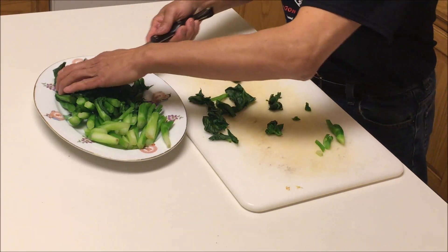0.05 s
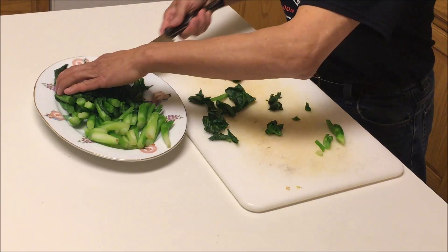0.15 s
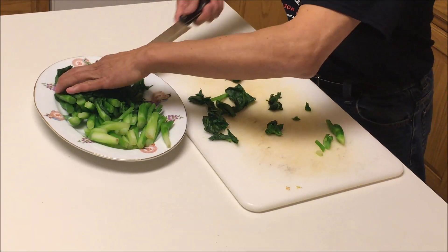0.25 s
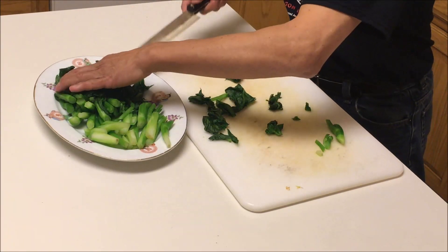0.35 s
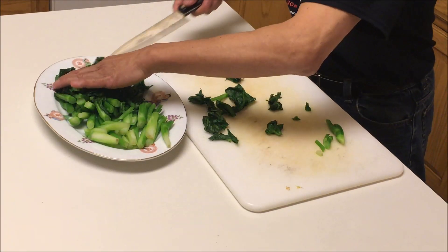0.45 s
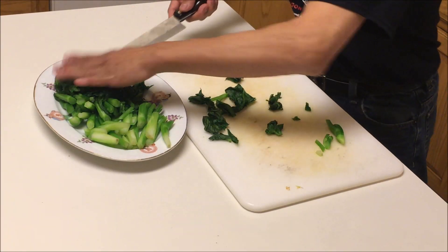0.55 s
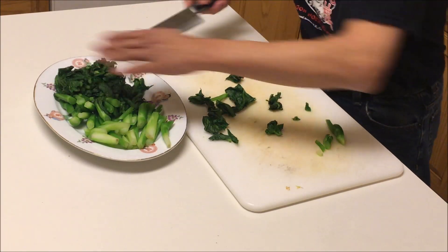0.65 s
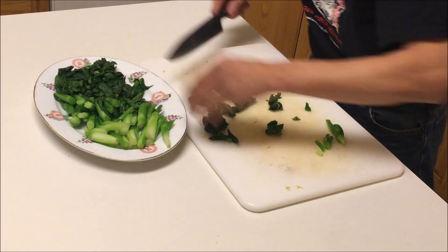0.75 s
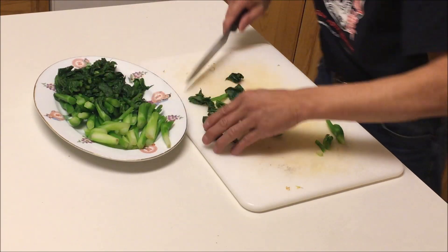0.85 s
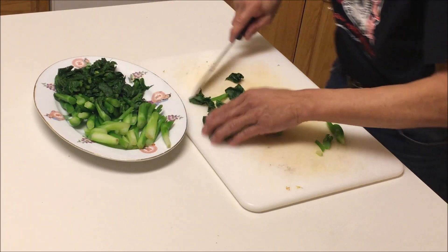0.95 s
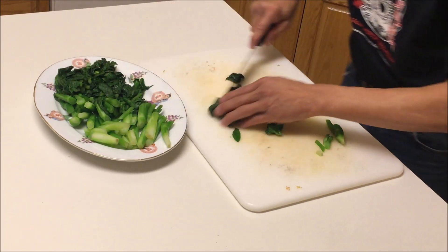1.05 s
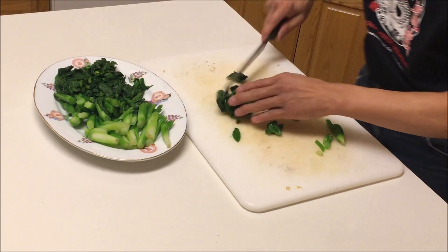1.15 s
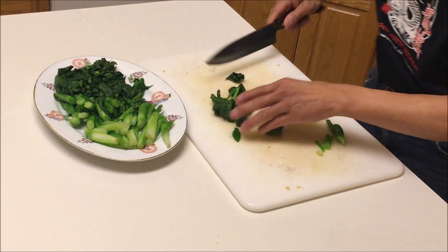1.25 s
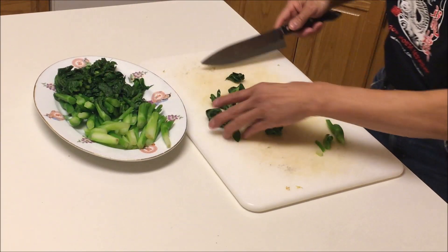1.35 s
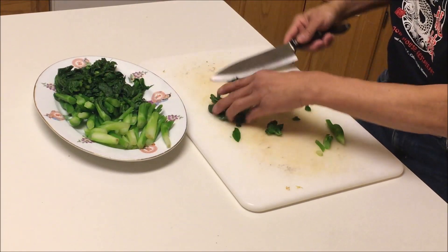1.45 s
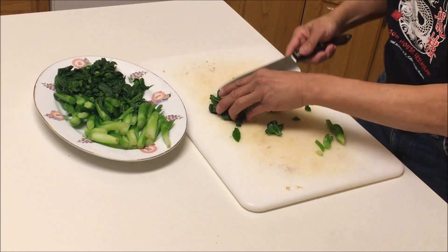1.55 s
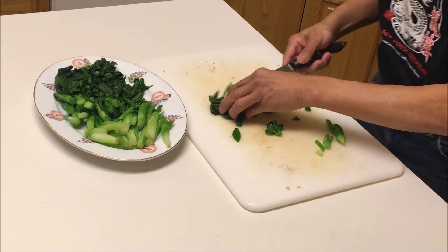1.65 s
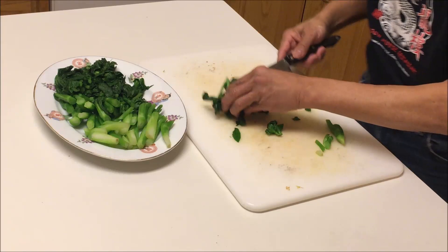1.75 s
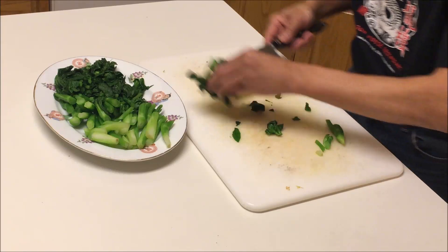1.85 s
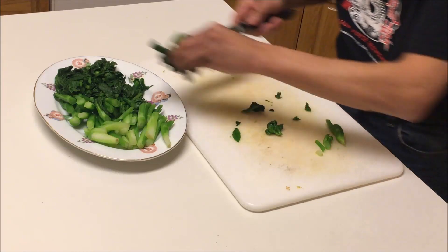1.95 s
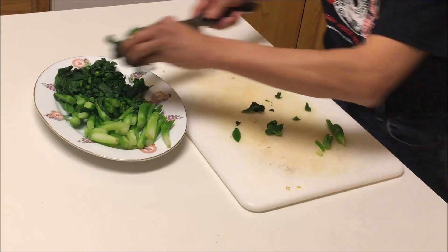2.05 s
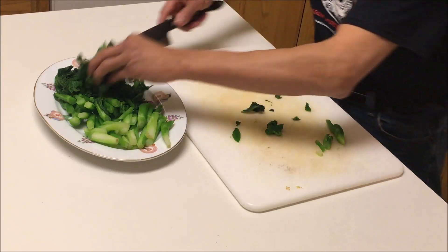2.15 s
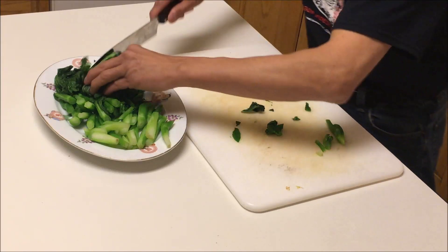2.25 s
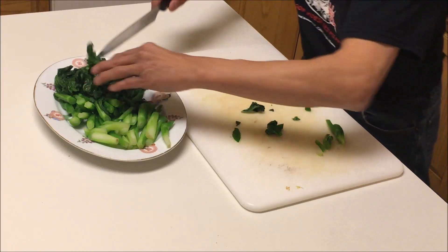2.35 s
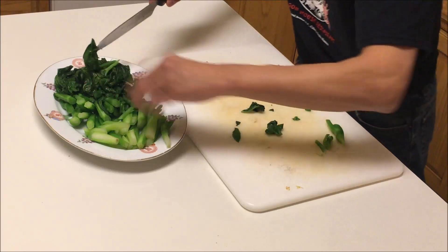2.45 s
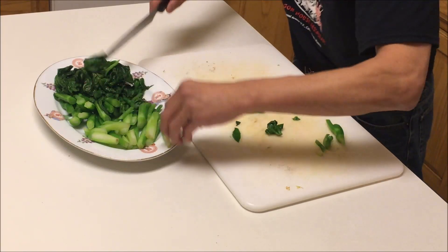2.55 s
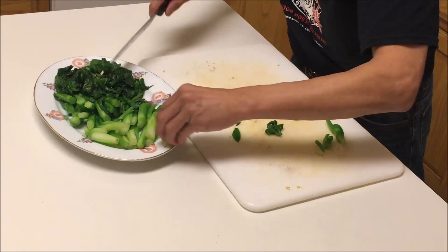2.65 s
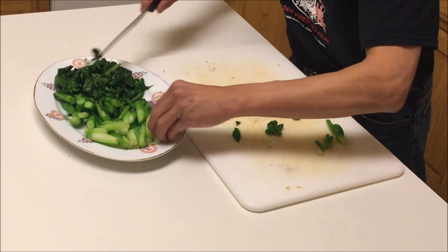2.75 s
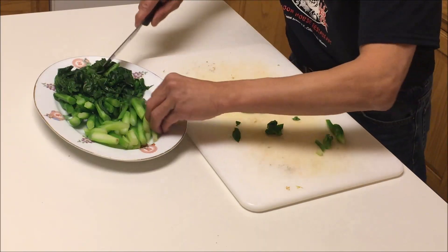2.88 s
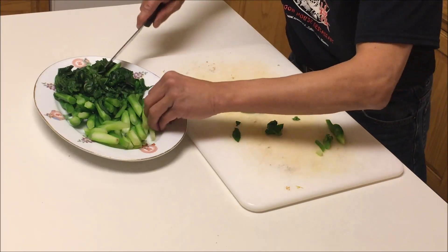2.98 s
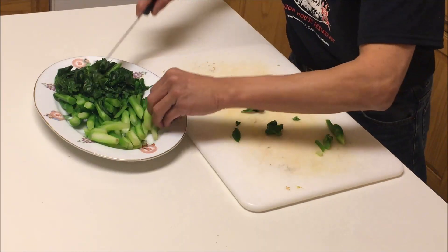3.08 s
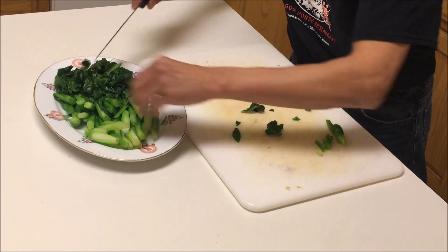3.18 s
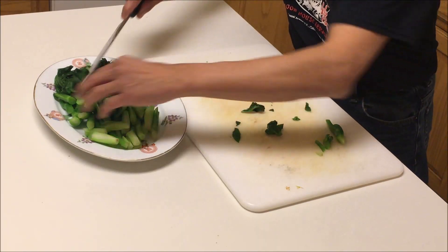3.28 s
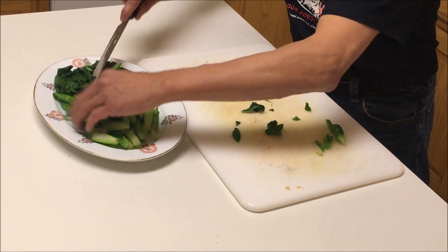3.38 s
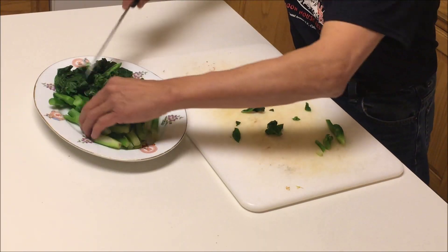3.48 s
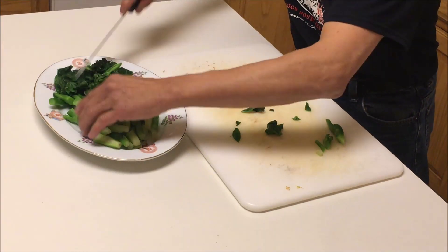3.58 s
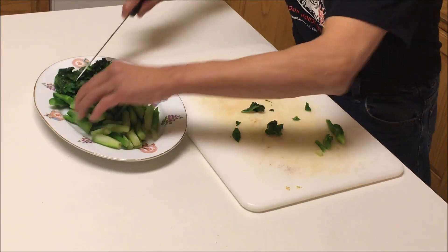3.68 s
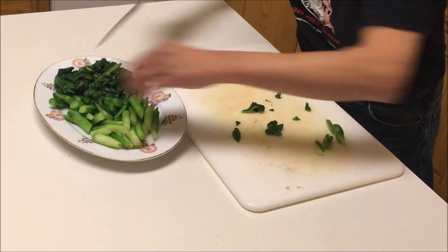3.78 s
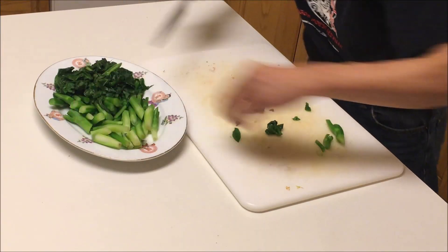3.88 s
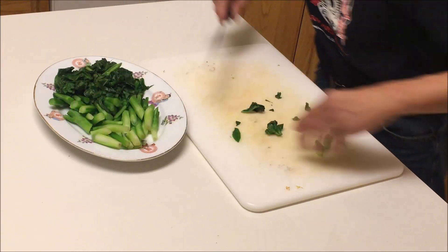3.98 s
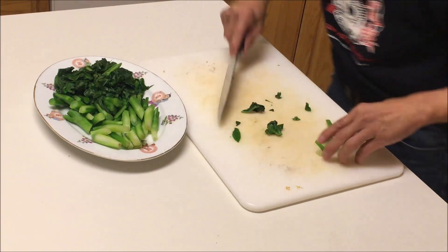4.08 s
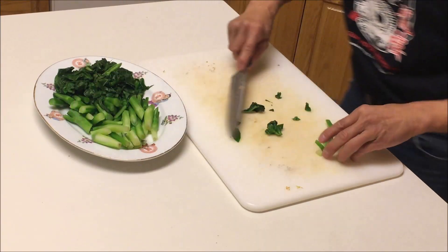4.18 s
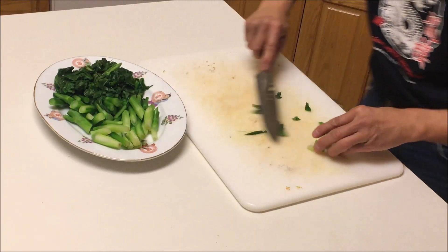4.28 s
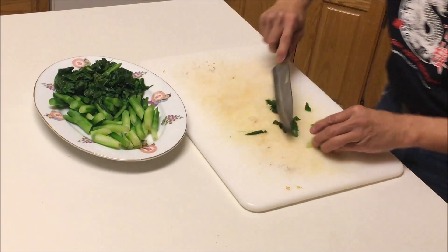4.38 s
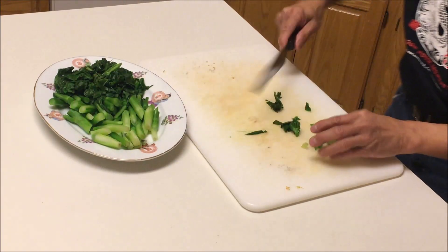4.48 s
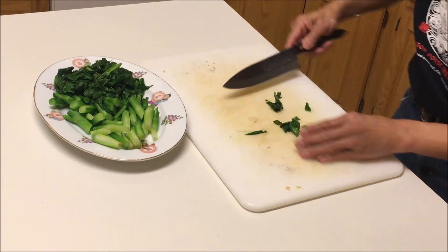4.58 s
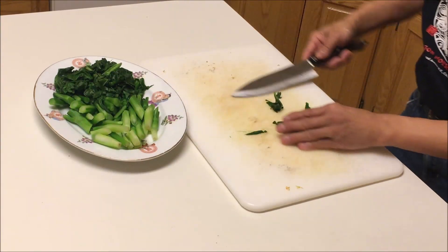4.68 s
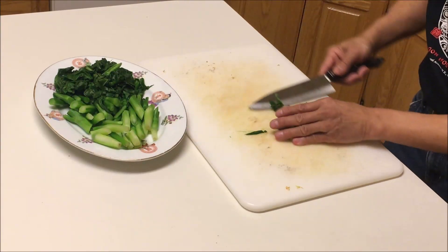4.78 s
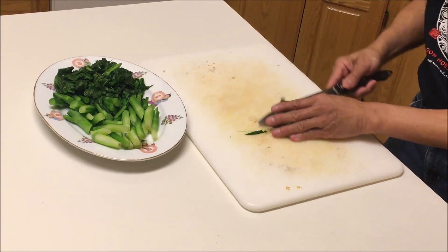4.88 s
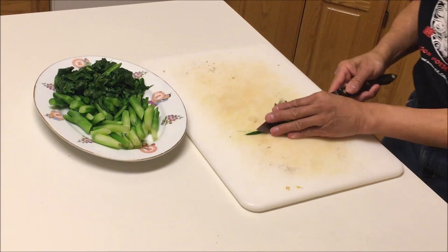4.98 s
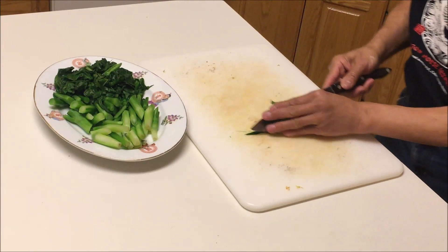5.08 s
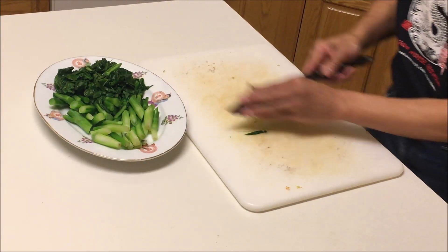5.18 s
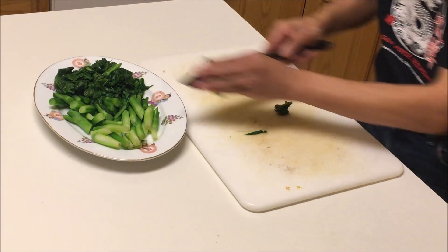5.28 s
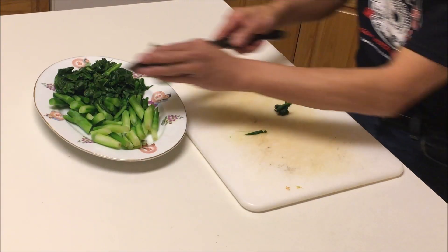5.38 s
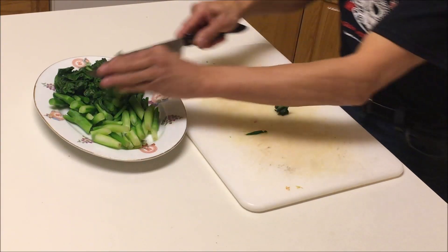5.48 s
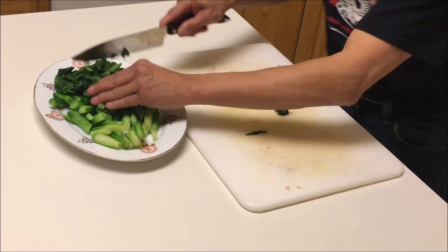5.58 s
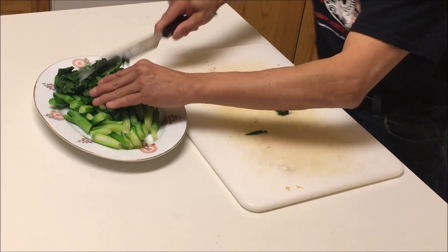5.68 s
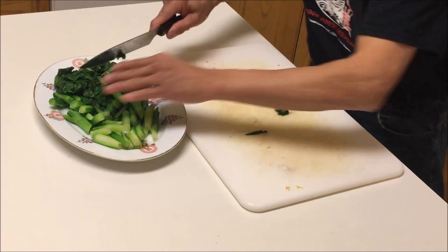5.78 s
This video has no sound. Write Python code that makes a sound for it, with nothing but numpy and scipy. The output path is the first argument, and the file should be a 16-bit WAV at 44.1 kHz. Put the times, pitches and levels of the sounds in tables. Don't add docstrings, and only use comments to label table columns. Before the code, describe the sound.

A low, steady refrigerator hum with soft, dull air noise fills a small hard-walled kitchen for about six seconds. Damp leaves rustle almost inaudibly in the fingers, with tiny ticks and faint squeaks further off. At 0.96 s a steel knife lands hard on a plastic cutting board: a loud hollow thud with an edge click, a soft rebound and short scrape at 1.05 s. At 1.49 s a lighter, brighter tap is followed by faint drags until about 1.7 s. Quiet returns, with small squeaks near 2.75 s. A china plate is nudged, faintly at 2.8 and 2.96 s, then tapping clearly at 3.04 and 3.14 s with a brief ring. At 4.2 s comes a second strong knock and the loudest raspy steel scrape, then a short flick. A moderate tap at 4.73 s and a dull one with a last drag at 4.89 s lead back to hum and faint rustling.

```python
import sys
import numpy as np
from scipy import signal
from scipy.fft import rfft, irfft, next_fast_len
from scipy.io import wavfile
from scipy.ndimage import uniform_filter1d, map_coordinates

SR = 44100
rng = np.random.default_rng(int(sys.argv[2]) if len(sys.argv) > 2 else 0)


def linear_from_db(decibels):
    return 10 ** (np.asarray(decibels, float) / 20)


def unload_audio(sound):
    columns = np.transpose(np.atleast_2d(sound))
    steps = np.round(np.clip(columns, -1, 1) * 32767)
    wavfile.write(sys.argv[1], SR, steps.astype(np.int16))


N = 257103


def unit(x):
    return x / np.sqrt(np.mean(x ** 2) + 1e-20)


def along(points, hz):
    f, v = np.transpose(points)
    return np.interp(np.log(hz + 1), np.log(f + 1), v)


def filtered(x, response):
    m = next_fast_len(len(x) + 8192)
    spectrum = rfft(x, m) * response(np.fft.rfftfreq(m, 1 / SR))
    return irfft(spectrum, m)[:len(x)]


def shaped_noise(x, curve):
    return unit(filtered(x, lambda f: linear_from_db(along(curve, f))))


def evened(x, size):
    z = rfft(x)
    usual = np.sqrt(uniform_filter1d(np.abs(z) ** 2, size=size))
    return irfft(z / usual, len(x))


def causal(gain):
    cepstrum = irfft(np.log(gain + 1e-6))
    half = len(cepstrum) // 2
    cepstrum[1:half] *= 2
    cepstrum[half + 1:] = 0
    return np.exp(rfft(cepstrum))


def resonances(modes, f):
    total = 0
    for k, (centre, width, db) in enumerate(modes):
        mode = 1j * f * width / (centre * centre - f * f + 1j * f * width)
        total = total + (-1) ** k * linear_from_db(db) * mode
    return total


def wobble(rate):
    knots = rng.standard_normal(int(N * rate / SR) + 4)
    return map_coordinates(knots, [np.arange(N) * rate / SR])


# (frequency [Hz], time to fall 60 dB [s])
KITCHEN_DECAY = [(100, 0.48), (300, 0.18), (1000, 0.38), (2500, 0.26), (6000, 0.28), (14000, 0.017)]


def room(x, wet_db):
    hz, t, z = signal.stft(rng.standard_normal(SR // 2), SR, nperseg=256)
    dying = linear_from_db(-60 * t / along(KITCHEN_DECAY, hz)[:, None])
    tail = signal.istft(z * dying, SR, nperseg=256)[1]
    tail = tail * np.clip(np.arange(len(tail)) / SR / 0.00073 - .3, 0, 1)
    tail = evened(np.pad(tail, (300, 0)), size=60)[300:-2000]
    return x + linear_from_db(wet_db) * signal.fftconvolve(x, tail / np.linalg.norm(tail))[:len(x)]


# (frequency [Hz], width [Hz], level [dB])
BOARD_MODES = [(90, 21, 15.5), (132.5, 5.6, 10), (245.5, 8.7, 9), (307, 24.4, 13), (415.4, 7.3, 6),
               (502.7, 9.3, 13), (635, 27, -1), (888, 46, 0), (870, 17, 8.5), (1234, 22, 15),
               (1430, 17, -28), (1610, 97, 11), (2060, 73, 0), (2310, 160, -16), (2600, 220, -9)]


def blow(colour_db, contact_s, wet_db):
    t = np.arange(SR * 2 // 3) / SR
    u = np.abs(t - .002) / contact_s * (t > .002)
    chatter = evened(rng.standard_normal(len(t)) * u * np.exp(-u), size=100)
    heard = evened(room(chatter, wet_db), size=50)
    heard = heard * np.clip(t / .002, 0, 1) ** 4 * np.clip((.6 - t) / .1, 0, 1)

    def struck(f):
        spread = np.exp(-2j * np.pi * 0.0487 * np.sqrt(f))
        return causal(linear_from_db(colour_db(f))) * spread * (1.12 + 0.48 * resonances(BOARD_MODES, f))

    wave = filtered(heard, struck)
    return wave / np.linalg.norm(wave)


def place(out, s, wave):
    at = round((s - .0025) * SR)
    return out + np.pad(wave, (at, N))[:N]


# (frequency [Hz], level [dB rms])
MOTOR_TONES = [(47, -61.5), (51.6, -65), (59, -52.5), (71.2, -65), (118.1, -54.5), (209.9, -67),
               (283.2, -64), (295.3, -64), (355, -67)]
# (frequency [Hz], level [dB per Hz])
AIR_COLOUR = [(20, -42), (40, -1), (55, -1.5), (90, -2), (160, -3), (250, -4.5), (320, -5.5), (420, -9.5),
              (750, -9.5), (980, -12), (1300, -19.5), (1700, -25.5), (2600, -31), (6000, -47.5)]


def refrigerator():
    t = np.arange(N) / SR
    hum = np.zeros(N)
    for hz, db in MOTOR_TONES:
        level = np.sqrt(2) * linear_from_db(db + .6 * wobble(2.5))
        hum += level * np.sin(2 * np.pi * (hz * t + rng.random() + .015 * wobble(2)))
    z = signal.stft(rng.standard_normal(N + 512), nperseg=512)[2]
    patches = uniform_filter1d(uniform_filter1d(rng.standard_normal(z.shape), 8, 0), 10, 1)
    air = signal.istft(z * linear_from_db(0.15 * unit(patches)), nperseg=512)[1][:N]
    return hum + linear_from_db(-52.5) * shaped_noise(air, AIR_COLOUR)


# (time [s], peak level [dB], frequency [Hz], width
# [Hz], length [s])
SQUEAK_EVENTS = [(0.13, -59, 8600, 2500, 0.0027), (0.559, -54, 4400, 4000, 0.00046),
                 (.585, -59, 10500, 4000, .001), (.875, -59.5, 7100, 1200, 0.071),
                 (1.372, -53.5, 2060, 70, 0.048), (1.382, -64, 1770, 60.5, 0.085),
                 (1.91, -56.5, 2060, 100, 0.039), (2.75, -50.5, 2046, 89.5, 0.062),
                 (2.85, -56.5, 2020, 70, 0.057), (2.901, -60, 1870, 80, 0.026),
                 (2.904, -56, 8200, 900, 0.036), (3.427, -68, 5350, 300, 0.013),
                 (3.655, -64, 1980, 80, 0.012), (4.965, -56, 9300, 2520, 0.19),
                 (5.352, -61, 2880, 2370, .006), (5.498, -56, 10100, 6030, .002)]


def squeaks():
    out, t = np.zeros(N), np.arange(SR // 2) / SR
    for s, db, hz, width_hz, length_s in SQUEAK_EVENTS:
        puff = rng.standard_normal(len(t)) * np.sin(np.pi * np.clip(t / length_s, 0, 1) ** 0.4) ** 2
        wave = filtered(puff, lambda f: resonances([(hz, width_hz, 0)], f) ** 2)
        out = place(out, s + .0025, linear_from_db(db) * room(wave / np.abs(wave).max(), wet_db=-9))
    return out


# (time [s], level [dB])
LEAF_SQUEEZES = [(.15, -75), (.36, -74), (.57, -71.5), (.9, -78), (1.2, -74), (1.39, -75), (1.8, -75),
                 (1.95, -74), (2.1, -71), (2.72, -81), (2.93, -76.5), (3.37, -70), (3.75, -72), (4.09, -76),
                 (4.53, -73), (4.68, -70.5), (5.1, -71), (5.38, -68), (5.52, -74), (5.64, -88)]


def leaves():
    grasp_db_per_s, loosen_db_per_s = 112, 73
    t = np.arange(N) / SR
    crinkle = rng.standard_normal(N) * linear_from_db(0.81 * wobble(210) + 2.5 * wobble(25))
    crinkle = shaped_noise(crinkle, [(800, -23), (2500, 3.0), (6000, -1), (15000, -11.5)])
    squeezes = []
    for s, db in LEAF_SQUEEZES:
        squeezes.append(db - np.maximum(grasp_db_per_s * (s - t), loosen_db_per_s * (t - s)))
    return linear_from_db(np.max(squeezes, axis=0)) * crinkle


# (time [s], peak level [dB], thud [Hz], ring level [dB])
PLATE_NUDGES = [
    (2.797, -37, 298, -37),
    (2.96, -33, 148, -41),
    (3.041, -19.5, 217, -26.5),
    (3.142, -20.5, 152, -31),
]
# (frequency [Hz], split [Hz], level [dB], time to fall 60 dB [s])
CHINA_MODES = [(1960, 46, -4.5, 0.17), (2935, 32, -11.5, 0.19), (3480, 26, -23, 0.25),
               (4160, 22, -21, 0.12), (5270, 28, -21, 0.17), (5740, 32, -30, 0.17)]
# (frequency [Hz], level [dB per Hz])
FOOT_COLOUR = [(35, -33), (95, -11.5), (130, -5), (420, -8.5), (640, -7), (1200, -17.5), (2000, -31.5),
               (3100, -38), (9000, -69)]


def plate():
    thud_boost_db, softness_dulls = 6.5, 2.1
    out, t = np.zeros(N), np.arange(SR * 2 // 3) / SR - .0028
    for s, db, thud_hz, ring_db in PLATE_NUDGES:
        thud_curve = [(thud_hz / 1.6, 0), (thud_hz, thud_boost_db), (thud_hz * 2.0, 0)]
        dull_curve = [(1600, 0), (3500, softness_dulls * (db + 20))]
        colour_db = lambda f: along(FOOT_COLOUR, f) + along(thud_curve, f) + along(dull_curve, f)
        ring = np.zeros(len(t))
        for hz, split_hz, level_db, t60 in CHINA_MODES:
            fading = linear_from_db(level_db - 60 * t / t60 + rng.normal(0, 2.5))
            ring += fading * np.sin(2 * np.pi * hz * t) * np.cos(np.pi * split_hz * t)
        thud = linear_from_db(22.0) * blow(colour_db, contact_s=0.0011, wet_db=2.5)
        ringing = linear_from_db(ring_db + 9.5) * room(ring * (t > 0), wet_db=-7.0)
        out = place(out, s, linear_from_db(db) * (thud + ringing))
    return out


# (frequency [Hz], width [Hz], level [dB])
BLADE_MODES = [(3280, 120, -2), (4040, 110, -0.5), (5390, 50, 6.2), (6320, 83, 8.5), (7160, 130, 4),
               (8200, 80, 7.5), (9100, 100, -3), (9750, 60, 4), (11400, 68, 1), (11720, 17, -3),
               (12600, 97, 4), (13650, 29, -6), (14700, 90, -16)]
# (frequency [Hz], level [dB per Hz])
EDGE_COLOUR = [(2470, -16), (4200, -7), (5730, -8.5), (6120, -7.5), (7640, -8.5), (12000, -4),
               (15800, -4.5)]
# (frequency [Hz], level [dB per Hz])
GRIT_COLOUR = [(1000, -13.5), (1800, -8), (3200, -5), (4500, -11), (7000, -18)]
# (frequency [Hz], level [dB per Hz])
DRAG_COLOUR = [(60, -35), (150, -19), (280, 3), (560, -8), (900, 0.5), (1250, -12), (2000, -14),
               (3000, -38), (5000, -74)]
# (start [s], swell [s], hold [s], edge hiss level [dB], board rumble level [dB])
SCRAPE_STROKES = [
    (1.042, 0.03, 0.0082, -49.5, -41.5),
    (1.478, 0.018, 0.021, -57, -41),
    (1.534, 0.017, 0.059, -58, -47),
    (1.628, 0.026, 0.042, -60.5, -47.5),
    (4.223, 0.067, 0.018, -40.5, -39),
    (4.378, 0.0023, 0.0044, -46.5, -52),
    (4.686, 0.13, 0.033, -57.5, -46.5),
    (4.882, 0.042, 0.025, -56, -39.5),
]


def scrape():
    swell_db, lift_db_per_s = 15.5, 236
    out, t = np.zeros(N), np.arange(N) / SR
    catching = linear_from_db(2.5 * wobble(300) + 1.6 * wobble(60))
    hiss = filtered(catching * rng.standard_normal(N), lambda f: linear_from_db(along(EDGE_COLOUR, f)))
    ringing = np.zeros(N)
    for hz, width, db in BLADE_MODES:
        grip = linear_from_db(4.5 * wobble(50))
        ringing += grip * linear_from_db(db) * signal.lfilter(*signal.iirpeak(hz, hz / width, SR), hiss)
    steel = unit(unit(hiss) + .95 * unit(ringing))
    coarse = catching ** 0.92 * linear_from_db(2.9 * wobble(45)) * rng.standard_normal(N)
    grit = shaped_noise(coarse, GRIT_COLOUR)
    bumps = rng.standard_normal(N) * linear_from_db(3.5 * wobble(90))
    board = unit(filtered(bumps, lambda f: linear_from_db(along(DRAG_COLOUR, f)) * (1 + .5 * resonances(BOARD_MODES, f))))
    for s, swell, hold, edge_db, board_db in SCRAPE_STROKES:
        speed_db = -swell_db * np.clip(1 - (t - s) / swell, 0, 1)
        speed_db = speed_db - lift_db_per_s * np.maximum(t - s - swell - hold, 0)
        touch = np.clip((t - s) / .006, 0, 1)
        edge = linear_from_db(speed_db) * (linear_from_db(edge_db) * steel + linear_from_db(edge_db - 2) * grit)
        rumble = linear_from_db(board_db + 0.68 * speed_db) * board
        out += touch * (edge + rumble)
    return room(out, wet_db=-5.0) * linear_from_db(-3.0)


# (time [s], peak level [dB], brightest frequency [Hz])
EDGE_CLICKS = [
    (0.957, -38, 3620),
    (1.486, -46.5, 4160),
    (1.486, -44.5, 5400),
    (4.2, -44, 5270),
]


def clicks():
    out = np.zeros(N)
    for s, db, hz in EDGE_CLICKS:
        colour = [(1500, -30), (0.23 * hz, -8), (hz, 0), (1.15 * hz, -8), (15000, -16)]
        wave = blow(lambda f: along(colour, f), contact_s=0.0003, wet_db=-1.5)
        wave = wave + linear_from_db(7) * filtered(wave, lambda f: resonances(BLADE_MODES[1:], f))
        out = place(out, s, linear_from_db(db + 17.5) * wave)
    return out


def landing(thud_hz, corner_hz, corner_db):
    thud_db = -0.5 + 0.81 * max(-31.5 - corner_db, 0)
    return [(35, -40), (65, -7), (140, -3), (thud_hz, thud_db), (1.57 * thud_hz, -3), (930, -2.5),
            (1500, 0.37 * corner_db - 4), (corner_hz, corner_db),
            (1.176 * corner_hz, corner_db - 18), (15000, corner_db - 43)]


# (time [s], peak level [dB], rebounds per second = thud [Hz],
# hardness corner [Hz], level at the corner [dB])
BLADE_KNOCKS = [
    (0.956, -11.5, 169.6, 2520, -13.5),
    (1.05, -29.5, 197, 2700, -37),
    (1.485, -24, 453, 2060, -15),
    (4.199, -15.5, 328, 3320, -30.5),
    (4.732, -23, 239, 3400, -29),
    (4.888, -29, 272, 1900, -49),
]


def knocks():
    rebound = 0.38
    out = np.zeros(N)
    for s, db, thud_hz, corner_hz, corner_db in BLADE_KNOCKS:
        colour = landing(thud_hz, corner_hz, corner_db)
        wave = blow(lambda f: along(colour, f), contact_s=0.0014, wet_db=0.0)

        def bouncing(f):
            return 1 / (1 - rebound / (1 + (f / 1800) ** 2) * np.exp(-2j * np.pi * f / thud_hz))

        out = place(out, s, linear_from_db(db + 22.5) * filtered(wave, bouncing))
    return out


def scene():
    return (refrigerator() + squeaks() + leaves() + plate() + scrape() + clicks() + knocks())[None]


THIN_MOMENTS = [.011, .054, .065, .075, .086, .097, .182, .673, 1.419, 1.526, 1.611, 2.038, 2.209, 2.294,
                2.55, 2.785, 2.827, 2.913, 3.233, 3.617, 3.702, 3.83, 4.427, 4.513, 4.939, 5.067, 5.131,
                5.302, 5.409, 5.643]


def thinned(x, keep_db):
    size = round(SR * 2048 / 48000)
    window = np.sin(np.pi * (np.arange(size) + .5) / size)
    y = np.pad(x, size)
    treble = along([(1400, 0), (3200, .92), (6000, 1)], np.fft.rfftfreq(size, 1 / SR))
    for s in THIN_MOMENTS:
        at = round(s * SR) + size - size // 2
        z = rfft(window * y[at:at + size])
        weak = np.abs(z) < linear_from_db(keep_db) * uniform_filter1d(np.abs(z), size=25)
        y[at:at + size] -= window ** 2 * irfft(z * weak * treble, size)
    return y[size:-size]


def top_cut(x):
    return signal.sosfilt(signal.butter(12, 16270, fs=SR, output="sos"), x)


# (frequency [Hz], level [dB per Hz])
HISS_COLOUR = [(1760, -67), (3000, 2.5), (4310, 3.5), (4710, -0.5), (7050, 5), (7940, -2.5), (8630, 5.5),
               (10500, -5), (11400, 0.5), (14600, -4.5), (15800, 0.5)]


def record(dry):
    hiss = linear_from_db(-74.5) * shaped_noise(rng.standard_normal(N), HISS_COLOUR)
    mix = thinned(dry[0] + hiss, keep_db=6.3)
    mix = filtered(mix, lambda f: f < 15850)
    return top_cut(mix[None])


dry = scene()
out = record(dry)
unload_audio(out)
```